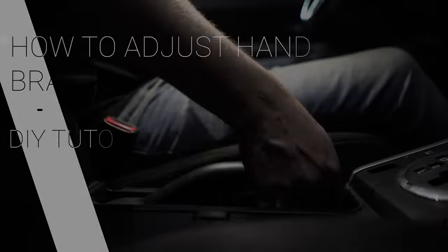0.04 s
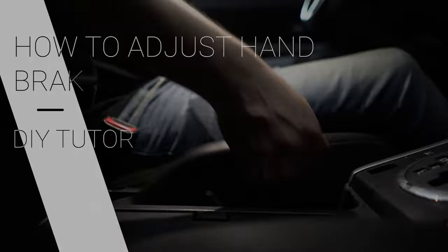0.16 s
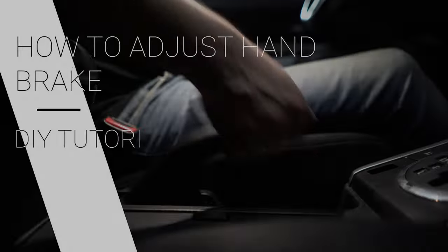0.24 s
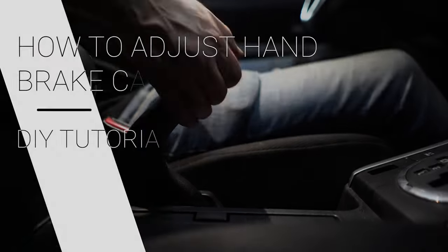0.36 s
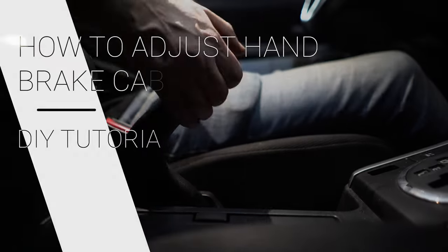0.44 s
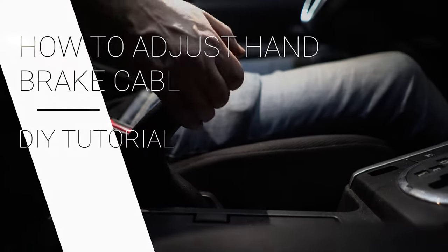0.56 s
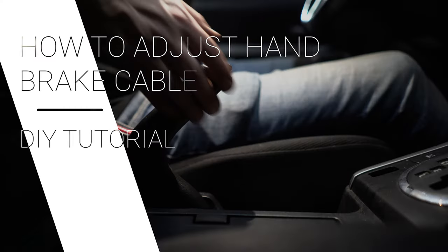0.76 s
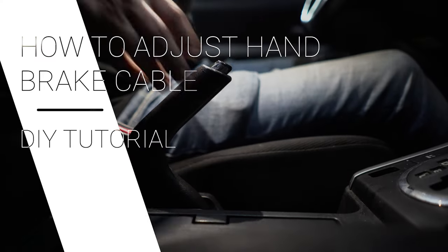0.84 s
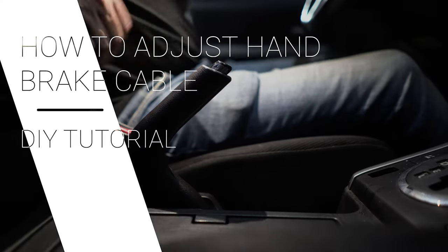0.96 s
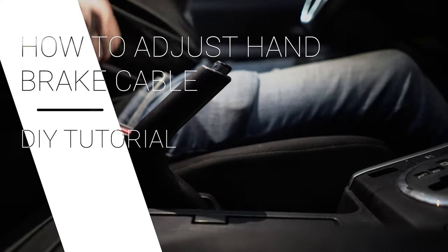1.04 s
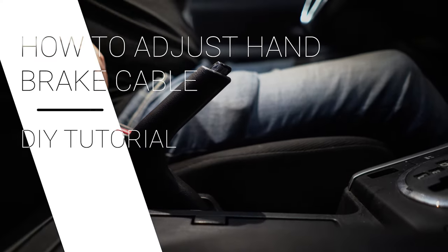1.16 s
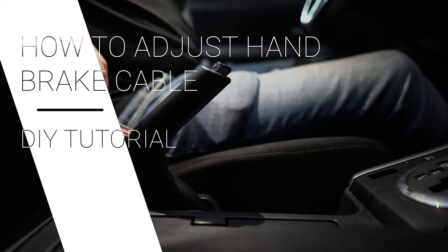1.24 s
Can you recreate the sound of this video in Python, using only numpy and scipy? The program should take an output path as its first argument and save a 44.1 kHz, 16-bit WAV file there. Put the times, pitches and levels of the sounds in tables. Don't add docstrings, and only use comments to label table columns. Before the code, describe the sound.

A handbrake lever is pulled up in one quick stroke, about fifteen rapid metal clicks merging into a rasp, then faint palm friction, small ticks and a soft low thud; quiet parked car interior, close stereo microphone.

```python
import sys
import numpy as np
from scipy import signal
from scipy.io import wavfile
from scipy.ndimage import uniform_filter1d

SR = 44100
rng = np.random.default_rng(int(sys.argv[2]) if len(sys.argv) > 2 else 0)


def makeup_ratio(level_db):
    decades = np.asarray(level_db, float) / 20
    return 10 ** decades


def store_wav(level_fs):
    pcm = np.round(np.clip(np.atleast_2d(level_fs), -1, 1) * 32767)
    wavfile.write(sys.argv[1], SR, pcm.T.astype(np.int16))


N = 57330
SIDES = np.array([[1], [-1]])

# f/Hz, left-right likeness
FAR_LIKENESS = [(60, 1.0), (180, 0.87), (550, 0.82), (1650, 0.51), (4970, -0.62), (15000, -0.27)]


def rms_one(x):
    return x / np.sqrt(np.mean(x ** 2) + 1e-20)


def in_time(rows):
    return makeup_ratio(np.interp(np.arange(N) / SR, *np.transpose(rows)))


def at_hz(points, hz):
    table_hz, values = np.transpose(points)
    return np.interp(np.log(hz), np.log(table_hz), values)


def drift(rate):
    knots = rng.standard_normal(200)
    return np.interp(np.arange(N) / SR * rate, np.arange(200), knots)


def filtered(x, order, hz, kind):
    return signal.sosfilt(signal.butter(order, hz, kind, fs=SR, output="sos"), x)


def dull(x):
    return filtered(x, 8, 12600, "low")


def ring(clicks, hz, t60):
    radius = makeup_ratio(-60 / (t60 * SR))
    w = 2 * np.pi * hz / SR
    return signal.lfilter([0, np.sin(w)], [1, -2 * radius * np.cos(w), radius * radius], clicks + 1e-18)


def envelope(s, rise, hold, t60):
    out, first = np.zeros(N), int(s * SR)
    t = np.arange(min(N - first, int((rise + hold + 2 * t60) * SR))) / SR
    release = makeup_ratio(-60 * np.clip(t - rise - hold, 0, 1) / t60)
    out[first:first + len(t)] = np.clip(t / rise, 0, 1) * release
    return out


def grains(per_s, spread_db):
    sizes = makeup_ratio(spread_db * np.minimum(rng.exponential(1, (4, N)), 4))
    sizes = sizes * rng.choice([-1, 1], (4, N))
    return rms_one(sizes * (rng.random((4, N)) < per_s / SR))


def stereo(mid, side, likeness, hz):
    alike = np.clip(at_hz(likeness, hz), 0, 1)
    return np.sqrt(1 + alike) * mid + np.sqrt(1 - alike) * side * SIDES


def banded(source, spectrum, likeness, shape):
    # f/Hz, left-right level/dB
    balance = [(60, 0.5), (150, 0.5), (380, -0.5), (950, -4.5), (2380, 1.5), (5980, -4), (15000, 1.5)]
    out, edges = 0, 26.5 * 2 ** np.arange(0, 9.6, .5)
    for k, (low, high) in enumerate(zip(edges, edges[1:])):
        hz = np.sqrt(low * high)
        mid, side = filtered(source[k % 2::2] * shape(hz) + 1e-18, 2, [low, high], "band")
        gain = makeup_ratio(at_hz(spectrum, hz)) * makeup_ratio(at_hz(balance, hz) / 2 * SIDES)
        out = out + gain * stereo(mid, side, likeness, hz)
    return out


def background():
    # f/Hz, level/dB per Hz
    hush_colour = [(15, -36), (25, 10.5), (202, -2), (742, -7), (1280, -21.5), (1920, -10), (3880, -22),
                   (11800, -42), (16400, -44.5)]
    # t/s, level/dB
    fade = [
        (0, -7.5),
        (.15, 0),
        (.5, 8.5),
        (1.3, 2.5),
    ]
    hush_db, whir_db, whir_hz = -72, -72, (897, 1387)
    hush = banded(rng.standard_normal((4, N)), hush_colour, FAR_LIKENESS, lambda hz: makeup_ratio(2 * drift(5)))
    mid, side = filtered(rng.standard_normal((2, N)), 3, whir_hz, "band")
    whir = rms_one(mid + .5 * side * SIDES) * makeup_ratio(1.7 * drift(31.4))
    return in_time(fade) * (makeup_ratio(hush_db) * rms_one(dull(hush)) + makeup_ratio(whir_db) * whir)


def thuds():
    # t/s, peak level/dB, f/Hz, t60/s
    bumps = [(.018, -63, 183, 0.032), (0.104, -58.5, 450, 0.072), (.172, -58.5, 402, 0.056),
             (0.957, -44.5, 123.5, 0.053), (0.964, -50, 66, 0.061), (.96, -57.5, 265, 0.02),
             (1.091, -54.5, 49.5, 0.37), (1.095, -59, 237, 0.034), (1.238, -51.5, 222, 0.12)]
    t, out = np.arange(N) / SR, 0
    for s, db, hz, t60 in bumps:
        swing = np.sin(2 * np.pi * hz * (t - s) + drift(40))
        out = out + makeup_ratio(db) * envelope(s, .5 / hz, 0, t60) * swing
    return out


def rumble():
    # t/s, level/dB
    shifting = [(0, -86.5), (.19, -63.5), (.47, -49), (.56, -62), (.75, -68), (.93, -92), (.975, -57),
                (1.04, -64), (1.11, -62.5), (1.17, -77.5), (1.23, -64), (1.3, -67)]
    # f/Hz, level/dB per Hz
    seat_colour = [(30, -12), (55, 7), (100, 6.5), (200, -2.5), (500, -16), (1000, -44)]
    lumps = banded(grains(800, 3.0), seat_colour, FAR_LIKENESS, lambda hz: makeup_ratio(2 * drift(9.4)))
    return in_time(shifting) * rms_one(lumps)


def ticks():
    # t/s, level/dB, centre f/Hz, length/s, share of broad crackle
    scuffs = [(0.099, -83.5, 6500, 0.011, 0.78), (.146, -73.5, 5700, 0.0063, 0.92),
              (0.17, -74, 3280, 0.0096, 0.52), (0.207, -54.5, 2540, 0.013, 0.14),
              (0.21, -64.5, 6530, 0.0042, 0.27), (0.805, -53.5, 1083, 0.0091, 0.06),
              (.898, -56.5, 2060, 0.018, 0.52), (0.954, -58, 2110, 0.016, 0.43),
              (0.995, -72, 5500, 0.02, 0.75), (0.999, -77.5, 11100, 0.0076, 0.081),
              (0.797, -80, 10500, .015, 0.12), (1.2038, -59, 1560, 0.024, 0.043),
              (1.205, -66.5, 2740, 0.036, 0.04), (1.208, -61.5, 756, 0.032, 0.036)]
    tail_t60_s, sharpness, crackle_hz = .05, 30, [900, 6600]
    raw = grains(9000, 1.7)[:2]
    raw = raw + 0.17 * raw[::-1]
    crackle = rms_one(dull(filtered(raw, 1, crackle_hz, "band")))
    out = 0
    for s, db, hz, length, broad in scuffs:
        t60 = sharpness / hz * (0.013 / length) ** 2
        shape = envelope(s, 0.00095, length / 2, tail_t60_s * length / .012)
        tone = ring(raw * shape, hz, t60) / ring(raw, hz, t60).std()
        out = out + makeup_ratio(db) * (tone + broad * crackle * shape)
    return out


def ratchet():
    # t/s, peak level/dB, push into the console/dB, brightness/(dB per octave)
    teeth = [(0.2285, -25.5, 5, 0), (0.2505, -26.5, 7, -0.5), (0.2673, -24, 4.5, 2), (0.2823, -23.5, 1, 1),
             (0.2962, -24, 3, 1), (0.3069, -25, 0.5, 1.5), (0.3177, -22, 1.5, -0.5), (0.3292, -26, -8, 4),
             (0.3406, -23.5, -13, 6.5), (0.3494, -26, 6.5, -0.5), (0.3592, -24.5, 2.5, 5),
             (0.3707, -28.5, -0.5, -1.5), (0.3841, -26, 6.5, 4.5), (0.4023, -25.5, 4, 4.5),
             (0.4373, -28, -3, 3.5)]
    # f/Hz, level/dB per Hz
    chatter_colour = [(150, -26), (250, -11.5), (599, -10.5), (666, -5), (928, -8.5), (1130, -5),
                      (7190, -4.5), (14000, -14), (16400, -43)]
    # f/Hz, t60/s
    chatter_t60 = [(300, 0.27), (1000, 0.023), (3000, 0.071), (7000, 0.03), (14000, 0.01)]
    # f/Hz, level/dB, t60/s, change over the stroke/dB
    metal = [(1290, -5, 0.034, 21.5), (1682, -6.5, 0.043, 19.5), (2526, -6, 0.053, -10.5),
             (2856, -3, 0.034, -5), (4260, -4, 0.024, 1.5), (4635, -2.5, .025, 11), (5050, -6, 0.034, 4),
             (5980, -6.5, 0.047, 1), (6870, 2.5, .015, -4.5), (8160, -17.5, 0.012, 2)]
    # f/Hz, level/dB, t60/s, left-right/dB, change over the stroke/dB
    body = [(56.6, -25.5, 0.35, 6.5, 4), (89.7, -4.5, .17, 0, 6.5), (152.7, 0.5, 0.16, -1.5, 0),
            (185.5, 3.5, 0.13, 1.5, 1), (272.8, -7, 0.16, 5, -2), (346.5, -6, 0.087, -2.5, 21),
            (438.7, -5, 0.12, -0.5, 4), (467, -2, 0.14, -1.5, -7.5), (562.2, 3.5, 0.088, -1, -5.5),
            (608, -4.5, .07, -1, -11), (914.5, 2, 0.13, -10, 8), (1046, -5, 0.12, -14, -12)]
    # f/Hz, left-right likeness
    near_likeness = [(60, 0.87), (180, 0.87), (550, 0.85), (1650, 0.72), (4970, -0.91), (15000, -1.2)]
    rise_s, hold_s = 0.00091, 0.0066
    chatter_db, metal_db, body_db, drag_db = -9, -17.5, -19, -32.5
    stroke_mid_s, stroke_s = .33, .21

    def burst(hz):
        gain = makeup_ratio(drag_db) * envelope(0.275, rise=0.076, hold=0.025, t60=0.078)
        octaves = np.log2(max(hz, 2000) / 4000)
        for at, db, _, bright_db in teeth:
            gain = gain + makeup_ratio(db + bright_db * octaves) * envelope(at, rise_s, hold_s, at_hz(chatter_t60, hz))
        return gain

    chatter = grains(5000, 2.5)
    out = makeup_ratio(chatter_db + 6) * banded(chatter, chatter_colour, near_likeness, burst)
    luck = rng.standard_normal((len(teeth), 40)) * 2
    s, peak_db, push_db, _ = np.transpose(teeth)
    angle = (s - stroke_mid_s) / stroke_s
    for k, (hz, db, t60, turn_db) in enumerate(metal):
        gains = makeup_ratio(peak_db + turn_db * angle + luck[:, k])
        strike = sum(g * envelope(at, rise_s, 0.0012, 0.0059) for at, g in zip(s, gains))
        rough = (rng.standard_normal((2, N)) + chatter[0]) * strike
        out = out + makeup_ratio(metal_db + db - 12.5) * ring(rough, hz, t60)
    for k, (hz, db, t60, pan_db, turn_db) in enumerate(body):
        clicks = np.zeros(N)
        clicks[((s + .0015) * SR).astype(int)] = makeup_ratio(peak_db + push_db + turn_db * angle + luck[:, 20 + k])
        push = uniform_filter1d(clicks, size=20) * np.sign(luck[0, k])
        out = out + makeup_ratio(body_db + db + pan_db / 2 * SIDES) * ring(push, hz, t60)
    return out


def palm():
    # t/s, level/dB
    slide = [(0, -83.5), (.42, -75), (.455, -57), (.56, -61.5), (.68, -64.5), (.8, -69), (.88, -74),
             (1.3, -81)]
    # f/Hz, width/Hz, level/dB
    grip = [(286, 860, 6), (1300, 690, 1.5), (2350, 250, -3), (3940, 210, 2), (5500, 900, -3.5),
            (7160, 330, -5), (10500, 9000, -17.5)]
    raw, out = grains(9400, 2.1), 0
    for k, (hz, width, db) in enumerate(grip):
        mid, side = raw[k % 2::2]
        pair = stereo(mid, side, FAR_LIKENESS, hz)
        out = out + makeup_ratio(db + drift(25)) * rms_one(ring(pair, hz, 1.42 / width))
    return in_time(slide) * rms_one(dull(out))


def sleeve():
    # t/s, level/dB
    rustle = [(0, -115), (.68, -100), (.8, -73.5), (.86, -83), (.98, -83.5), (1.13, -69), (1.18, -69.5),
              (1.27, -69), (1.3, -73)]
    # f/Hz, level/dB per Hz
    cloth_colour = [(1500, 4), (4000, 4), (7500, 4), (12000, -4), (16000, -3)]
    colour = [(700, -45)] + cloth_colour
    cloth = banded(grains(8000, 1.9), colour, FAR_LIKENESS, lambda hz: makeup_ratio(1.7 * drift(30)))
    return in_time(rustle) * rms_one(cloth)


def scene():
    return background() + thuds() + rumble() + ticks() + ratchet() + palm() + sleeve()


def top_cut(x):
    return signal.sosfilt(signal.butter(12, 16500, fs=SR, output="sos"), x)


def record(dry):
    side = filtered((dry[0] - dry[1]) / 2, 2, 350, "high")
    x = filtered(dry.mean(axis=0) + side * SIDES, 3, 42, "high")
    x = signal.sosfilt(signal.ellip(10, .5, 70, 16250, fs=SR, output="sos"), x)
    return top_cut(x)


dry = scene()
out = record(dry)
store_wav(out)
```